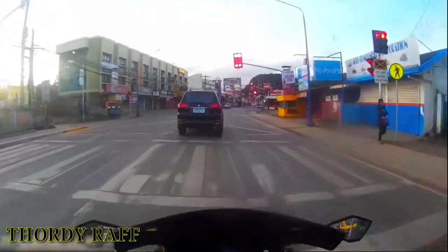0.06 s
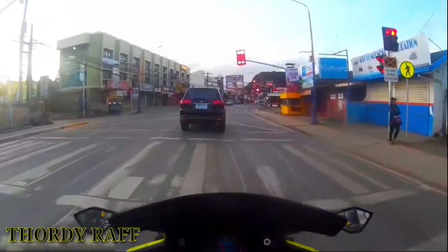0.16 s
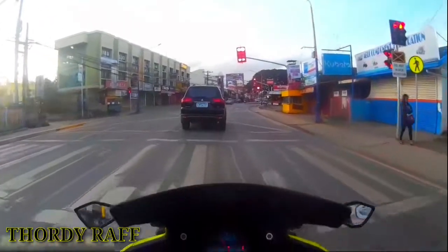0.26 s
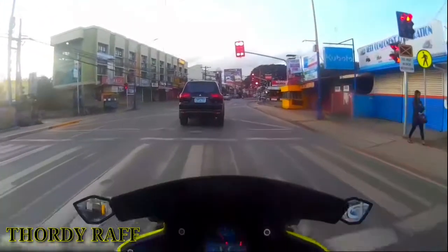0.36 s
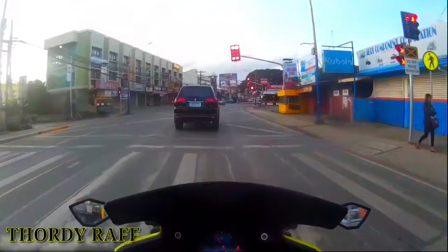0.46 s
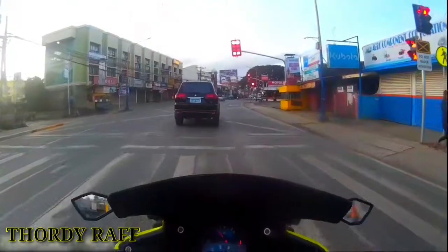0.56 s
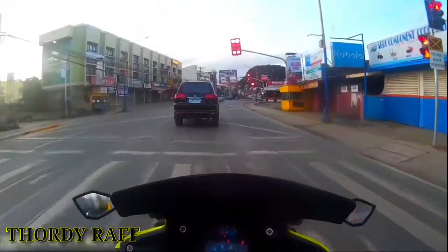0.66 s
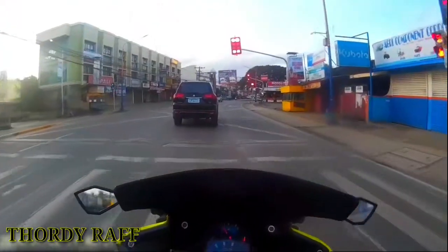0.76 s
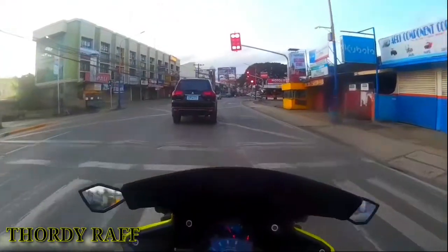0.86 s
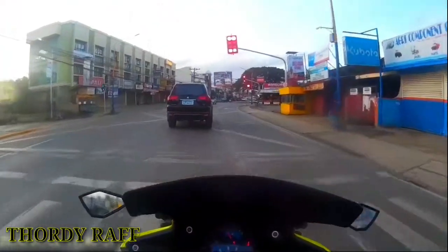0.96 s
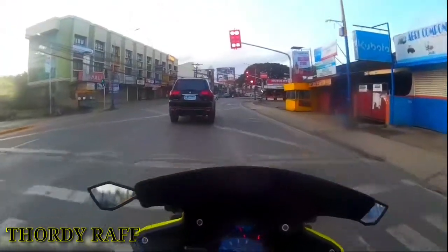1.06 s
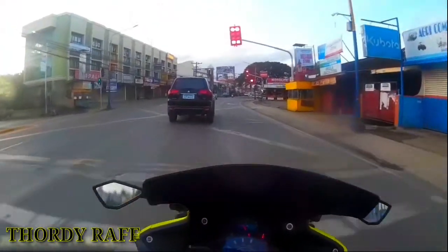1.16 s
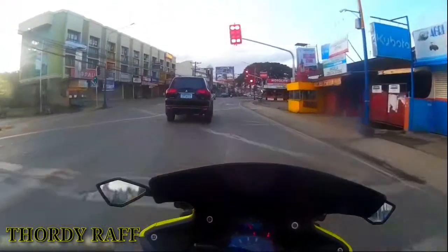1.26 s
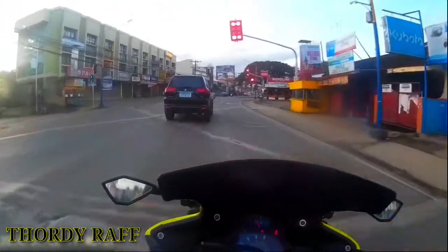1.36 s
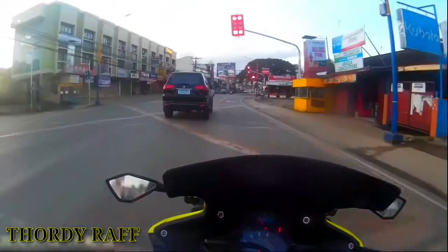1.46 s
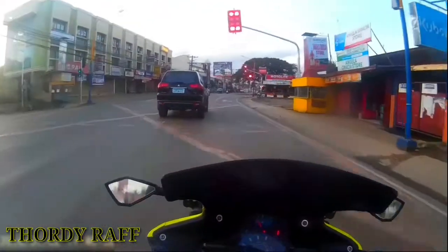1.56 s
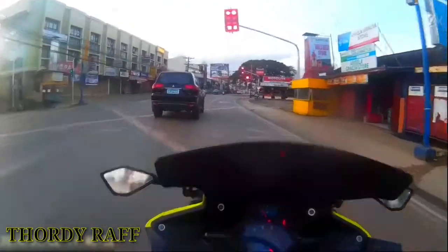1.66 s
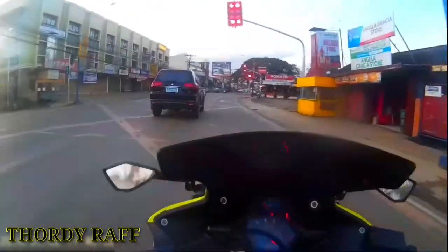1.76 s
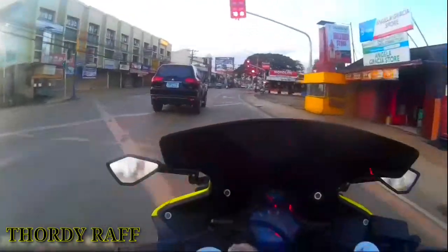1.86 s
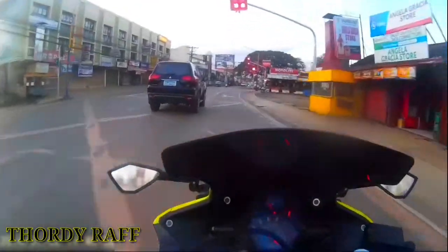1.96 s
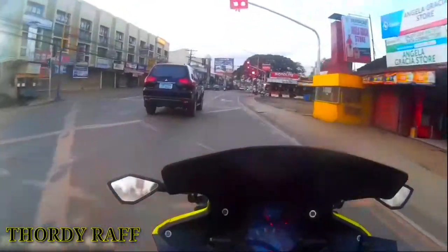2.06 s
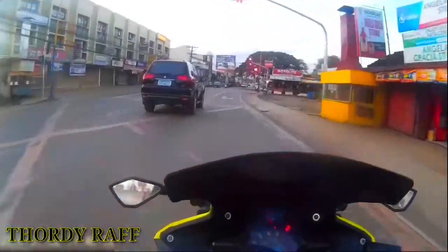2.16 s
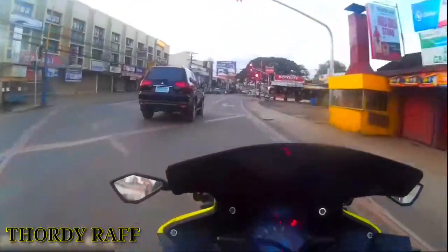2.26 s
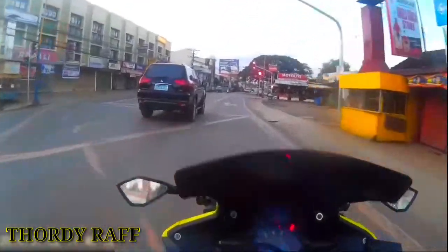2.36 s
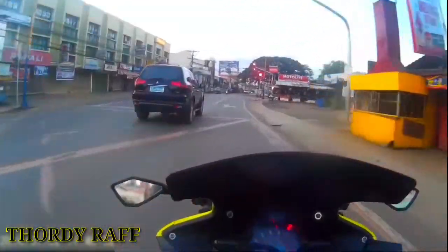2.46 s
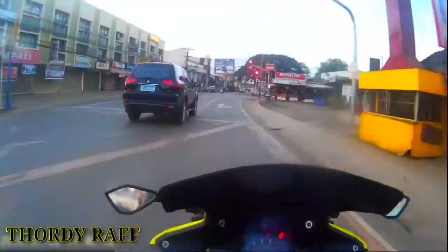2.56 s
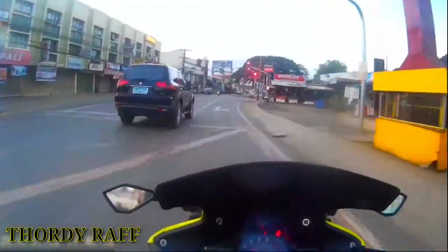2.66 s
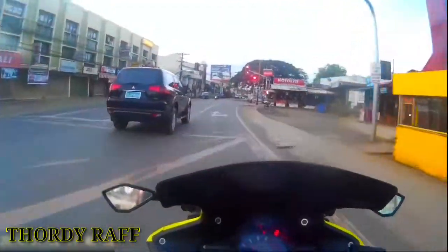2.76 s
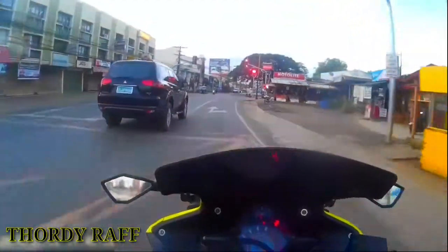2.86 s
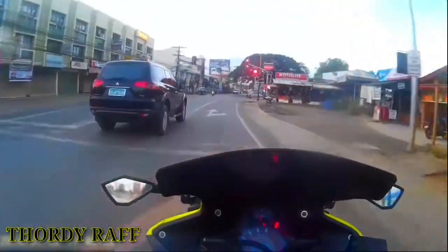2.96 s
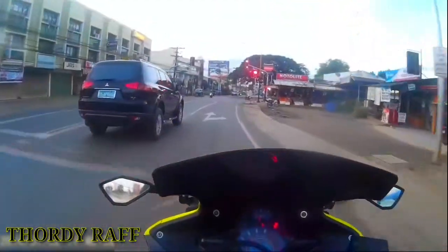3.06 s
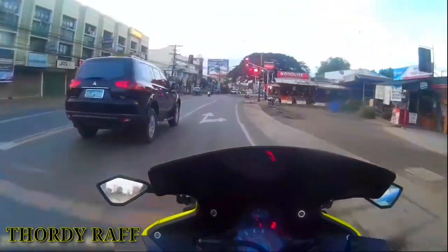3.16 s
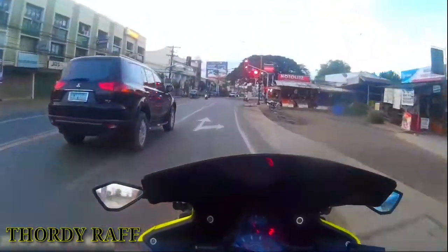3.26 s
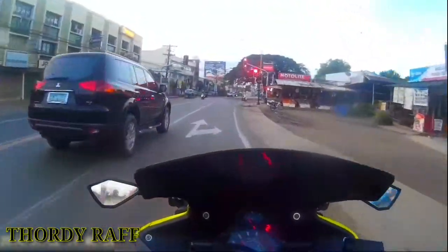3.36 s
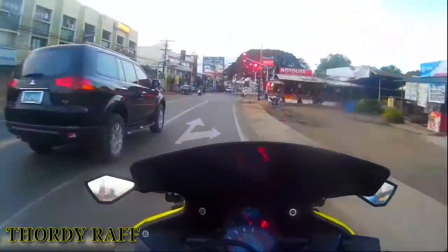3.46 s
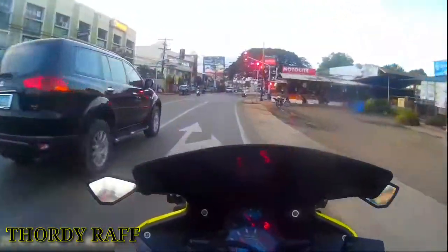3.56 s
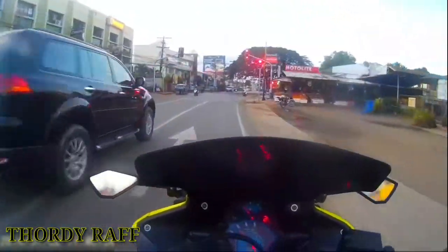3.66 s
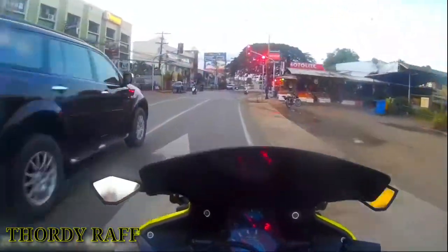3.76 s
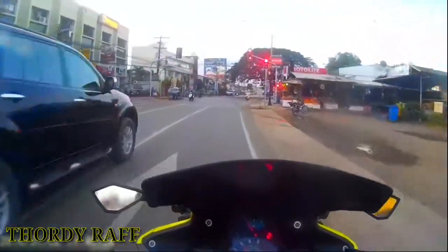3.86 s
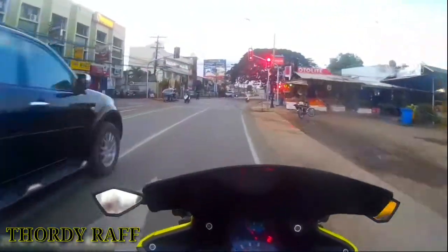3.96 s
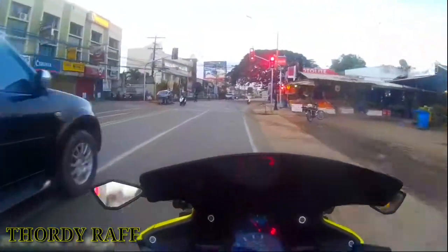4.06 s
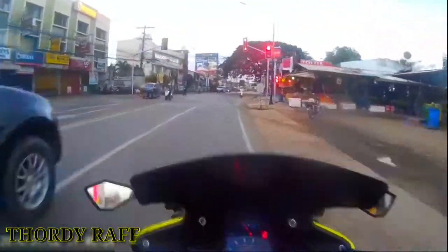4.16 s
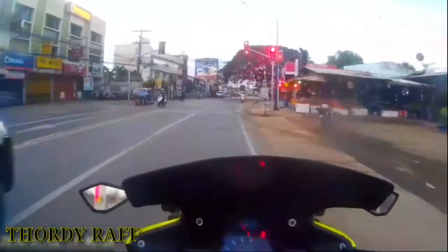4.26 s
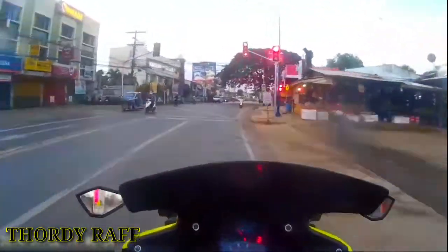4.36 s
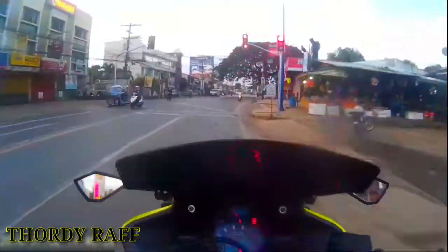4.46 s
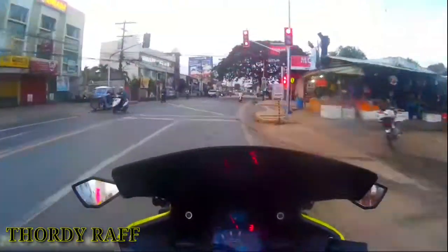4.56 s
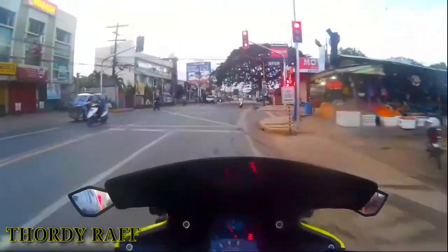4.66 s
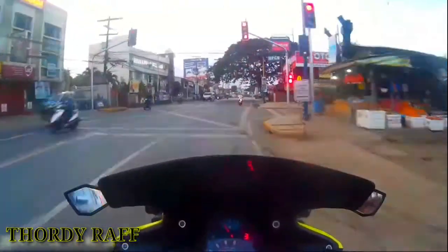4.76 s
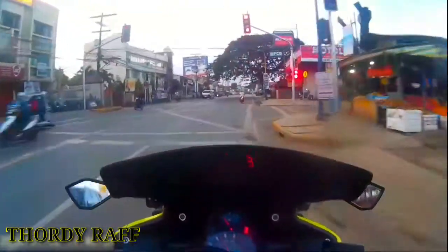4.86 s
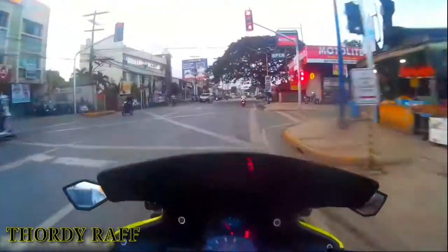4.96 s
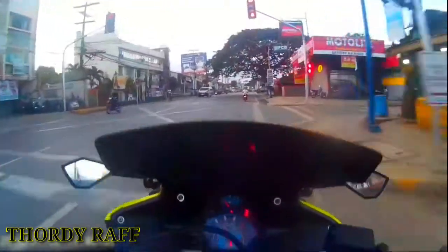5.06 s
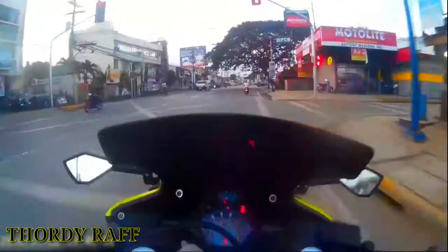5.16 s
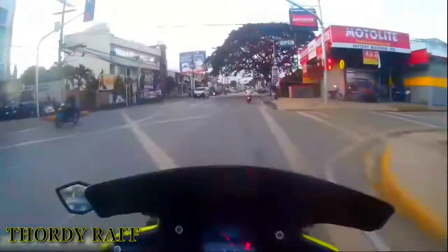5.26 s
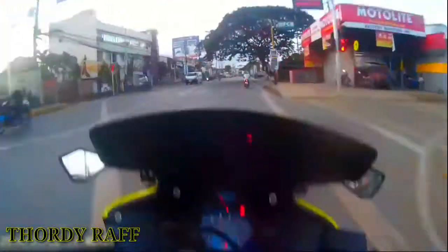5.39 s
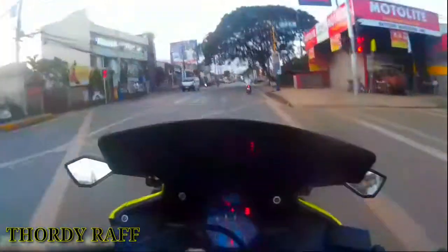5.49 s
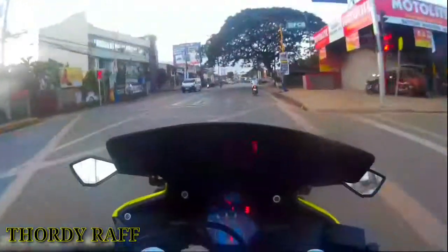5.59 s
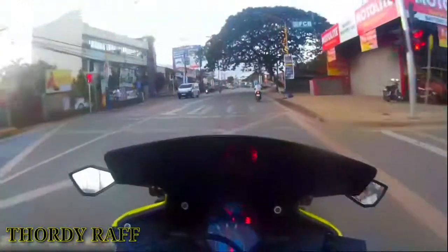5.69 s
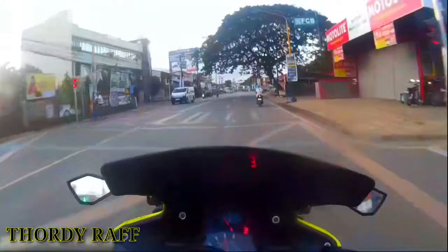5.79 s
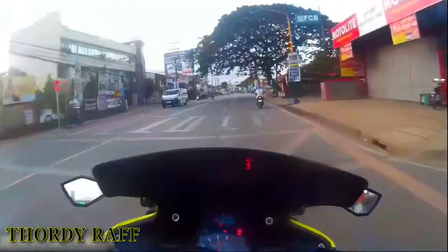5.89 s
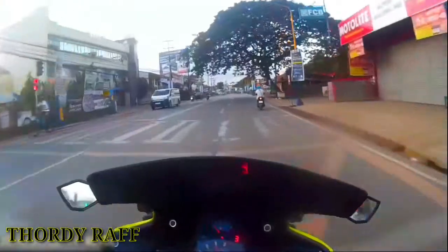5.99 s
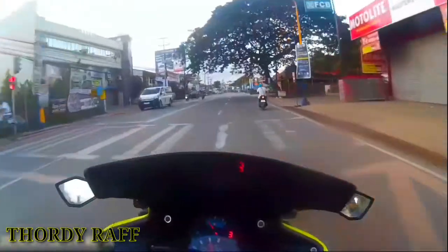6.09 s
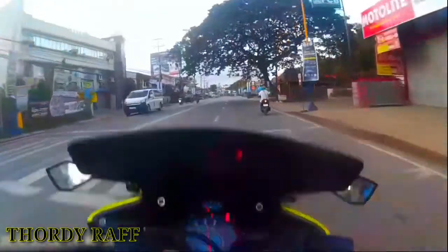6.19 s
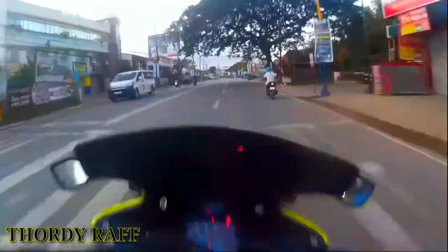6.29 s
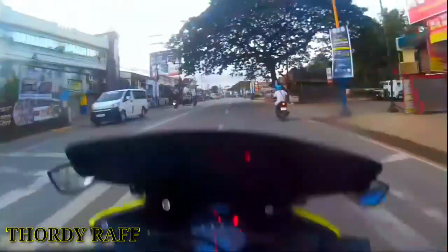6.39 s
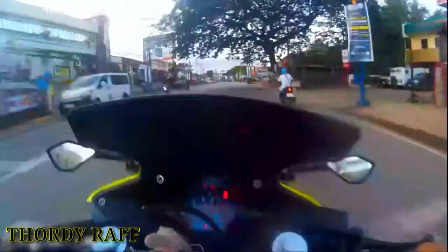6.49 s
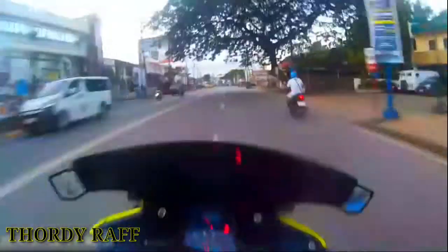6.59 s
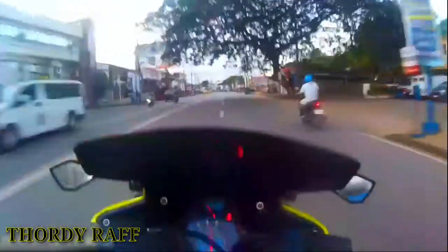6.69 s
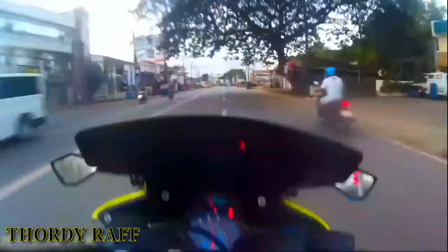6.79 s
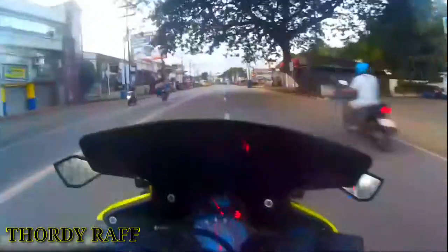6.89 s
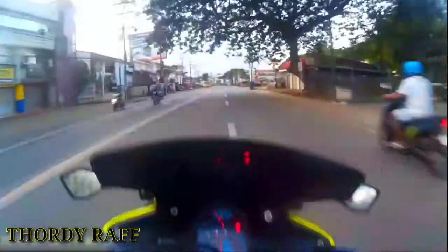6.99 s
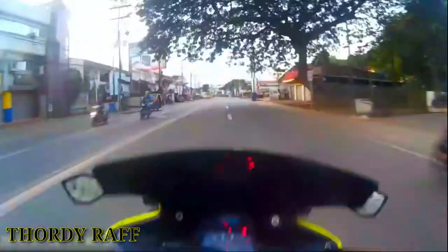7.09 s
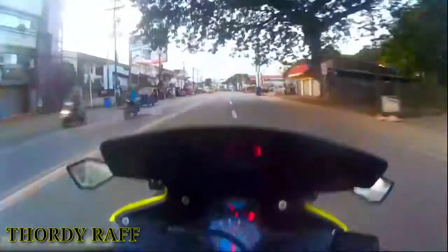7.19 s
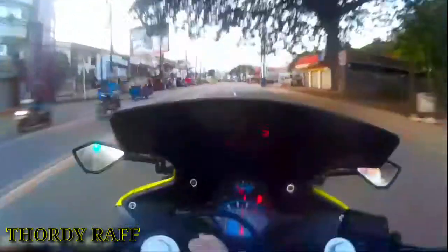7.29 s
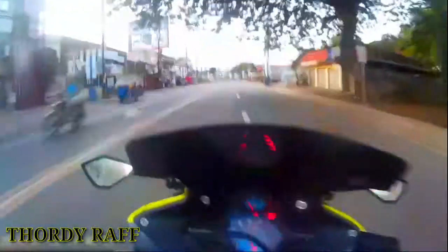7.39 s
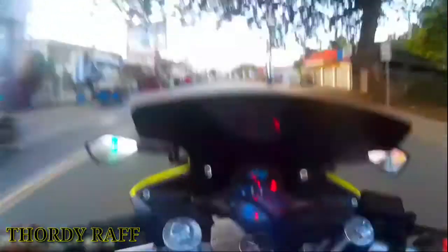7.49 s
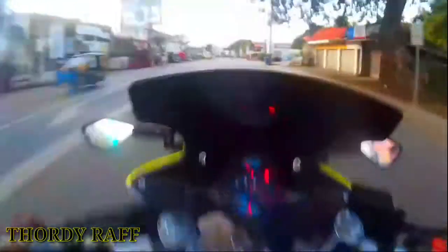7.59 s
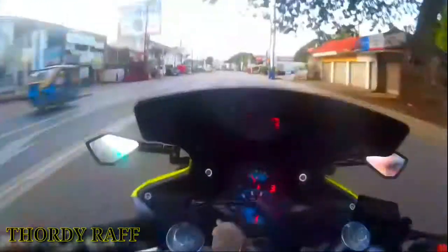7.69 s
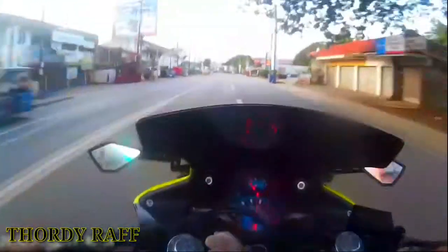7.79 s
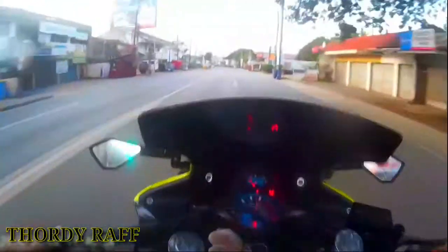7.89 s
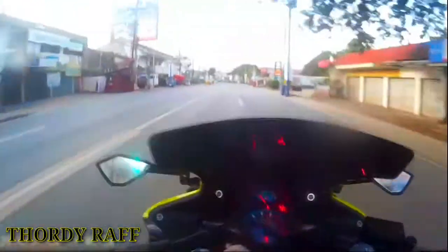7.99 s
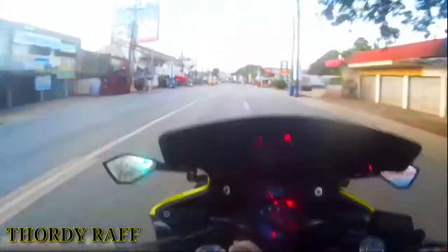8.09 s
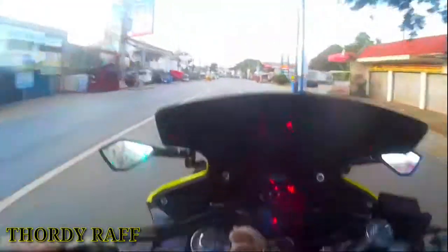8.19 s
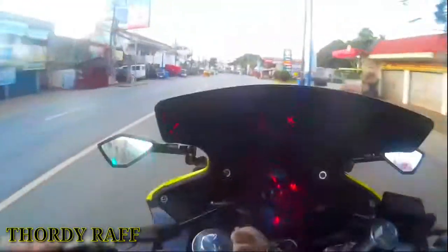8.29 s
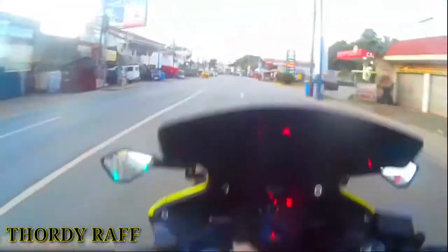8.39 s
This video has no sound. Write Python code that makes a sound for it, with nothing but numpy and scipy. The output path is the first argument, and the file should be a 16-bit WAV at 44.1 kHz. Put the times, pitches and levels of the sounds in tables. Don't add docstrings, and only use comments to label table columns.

```python
import sys
import numpy as np
from scipy import signal
from scipy.io import wavfile
from scipy.ndimage import uniform_filter1d

SR = 44100
rng = np.random.default_rng(int(sys.argv[2]) if len(sys.argv) > 2 else 0)


def voltage_ratio(decibels):
    exponent = np.asarray(decibels, float) / 20
    return 10 ** exponent


def persist_wave(psi):
    counts = np.round(np.clip(psi, -1, 1) * 32767).astype(np.int16)
    wavfile.write(sys.argv[1], SR, np.atleast_2d(counts).T)


N = 372204
T = np.arange(N) / SR
STEP = 64

# (t/s, level/dB)
AIRSPEED = [(0, -59), (1, -60), (1.9, -45), (2.1, -44.5), (2.7, -46), (3.5, -38.5), (4.4, -35),
            (5.2, -33.5), (6.5, -31), (7.5, -27), (8, -29), (8.44, -27)]


def evened(x):
    return x / np.sqrt(np.mean(x ** 2) + 1e-20)


def steady(x, span=4410):
    power = uniform_filter1d(uniform_filter1d(x ** 2, span), span)
    return x / np.sqrt(abs(power) + 1e-20)


def read(points, hz):
    f, value = np.transpose(points)
    return np.interp(np.log(hz + 1), np.log(f + 1), value)


def curve(points):
    return np.interp(T, *np.transpose(points))


def smooth(control):
    return np.interp(T, T[::STEP], control)


def colour(x, gain, size=8192):
    log_gain = np.log(np.maximum(gain(abs(np.fft.fftfreq(size, 1 / SR))), 1e-5))
    taps = np.fft.ifft(np.exp(np.conj(signal.hilbert(log_gain)))).real[:size // 2]
    return signal.oaconvolve(x, taps)[:N]


def drift(hz):
    coarse = signal.lfilter(*signal.butter(2, hz, fs=SR / STEP), rng.standard_normal(N // STEP + 1))
    return np.interp(T, np.arange(len(coarse)) * STEP / SR, evened(coarse))


def swell(s, length):
    return np.exp(-((T[::STEP] - s) / length) ** 2)


def street():
    # (f/Hz, level/dB per Hz)
    wash = [(12, -46), (20, -7), (54, -5), (157, -6), (282, -11), (517, -16.5), (1310, -21), (1420, -23),
            (2080, -21.5), (2500, -37), (3250, -63), (5500, -120)]
    noise = voltage_ratio(.7 * drift(4)) * rng.standard_normal(N)
    return voltage_ratio(-48) * evened(colour(noise, lambda f: voltage_ratio(read(wash, f))))


def hiss():
    # (f/Hz, level/dB per Hz)
    spectrum = [(1470, -53), (2500, 0), (3470, -2), (5070, -1.5), (6560, -1), (8560, -2.5), (11400, -1),
                (13400, -4), (15400, -20)]
    # (start t/s, end t/s, extra hiss before it/dB)
    ease = (1.3, 1.7, 1.5)
    noise = voltage_ratio(.5 * drift(12)) * rng.standard_normal(N)
    level_db = -56.47 + np.interp(T, ease[:2], [ease[2], 0])
    return voltage_ratio(level_db) * evened(colour(noise, lambda f: voltage_ratio(read(spectrum, f))))


def wind():
    # (f/Hz, level/dB per Hz)
    buffet = [(8, -22), (25, -11.5), (45, -5.5), (62, 1), (85, -3), (125, -6), (180, -14), (300, -20.5),
              (500, -24.5), (900, -71.5)]
    # (t/s, level/dB)
    gusts = [(2.92, 9), (3.08, 2), (3.16, -8), (3.42, 3), (3.67, -4), (3.74, 3), (3.83, 4), (3.9, 3.5),
             (4.72, -5), (4.98, -4), (5.15, 10.5), (5.44, 10), (5.5, -4), (5.64, 7), (5.75, -2), (6.51, 4),
             (6.63, 2), (7.03, 4), (7.31, 6), (7.57, 7), (7.73, 7), (7.89, 7), (7.93, 4), (8.01, 2),
             (8.12, -7), (8.3, 4.5)]
    gust_s, lumps_db = 0.015, -1
    noise = voltage_ratio(drift(22)) * rng.standard_normal(N)
    swings = colour(noise, lambda f: voltage_ratio(read(buffet, f)))
    gust_db = smooth(sum(db * swell(s, gust_s) for s, db in gusts))
    level_db = curve(AIRSPEED) + gust_db + lumps_db * drift(14.5) + 0.1
    return voltage_ratio(level_db) * steady(swings, span=8000)


def bumps():
    # (t/s, rattle level/dB, rattle length/s, thump level/dB)
    jolts = [
        (5.293, -31.5, 0.051, -27),
        (5.399, -29.5, 0.02, -22),
        (5.456, -28.5, 0.013, -15),
        (6.366, -25, 0.026, -29),
        (6.519, -33, 0.019, -21),
        (7.793, -27, 0.083, -27),
    ]
    thump_hz, thump_s = 62, 0.0078
    shape, thump = np.zeros(N), np.zeros(N)
    for s, rattle_db, length, thump_db in jolts:
        shape += voltage_ratio(rattle_db) * np.exp(-((T - s) / length) ** 2)
        pulse = np.exp(-((T - s) / thump_s) ** 2)
        thump += voltage_ratio(thump_db) * pulse * np.cos(2 * np.pi * thump_hz * (T - s))
    rattle = signal.lfilter(*signal.butter(1, 350, fs=SR), rng.standard_normal(N))
    rattle = evened(signal.lfilter(*signal.butter(2, 2200, fs=SR), rattle))
    return shape * rattle + thump


def controls():
    # (t/s, firing rate/Hz, mechanical effort/dB)
    rev_points = [(0, 30.5, -57), (.8, 40.7, -52.5), (1.5, 54.7, -37), (1.72, 59.2, -33.5),
                  (2.031, 63.1, -30), (2.21, 52.5, -38), (2.29, 44, -43.5), (4.1, 65.1, -26.5),
                  (4.25, 57.7, -31), (4.51, 44.9, -36), (5.1, 51.7, -36.5), (6.2, 54.4, -31),
                  (6.68, 59, -29.5), (7.45, 62.4, -24.5), (7.74, 62.8, -24), (7.92, 61.2, -28),
                  (8.08, 54.2, -32.5), (8.44, 53, -31)]
    # (t/s, exhaust level/dB, tilt/dB
    # per order, odd orders/dB)
    grip_points = [(0, -61, 9, 4), (.7, -49, -2.5, 3), (1.2, -40.5, -.5, 0), (1.5, -31.5, -6.5, 0),
                   (2, -30, -0.5, -7), (2.35, -36.5, 2, -6), (2.7, -33.5, -1.2, -0.5), (2.95, -35, -2.5, 4),
                   (3.35, -27, 0, -4.2), (3.8, -29.5, 2.5, 2), (4.1, -27, 6.5, 5), (4.35, -28.5, 0.5, 1),
                   (5.1, -30, 2, 2.8), (6.2, -26.5, 0.5, 1.5), (6.9, -28.5, 0.5, 1), (7.5, -26, 0.5, 3.5),
                   (7.95, -29, 0.5, 1.5), (8.44, -27, 1, .3)]
    # (t/s, change of firing
    # rate/Hz, length/s)
    snatches = [
        (1.616, -1.13, 0.051),
        (1.74, 0.98, 0.04988),
        (5.211, -1, .03),
        (5.289, 2.5, 0.049),
        (6.376, 4, 0.052),
        (6.527, -0.62, 0.0597),
        (6.962, -.55, 0.1502),
        (7.834, -0.9, 0.044),
        (8.217, .4, 0.093),
    ]
    # (t/s, length/s, exhaust change/dB, crank change/dB)
    shifts = [
        (2.024, 0.29, -25, -4),
        (4.104, 0.18, -22, -4),
        (7.77, .11, -17, -1.5),
    ]
    # (t/s, length/s, level/dB)
    buzz = (6.98, 0.99, 9.55)
    shut_s, shut_bend = 0.082, 0.73
    unload_db, unload_s = -9, 0.049
    coast_s = 0.092

    t = T[::STEP]
    (s, *revs), (at, *grip) = np.transpose(rev_points), np.transpose(grip_points)
    hz, effort_db = (np.interp(t, s, c) for c in revs)
    exhaust_db, tilt_db, odd_db = (np.interp(t, at, c) for c in grip)
    snatch = sum(change * swell(when, length) for when, change, length in snatches)
    hz = hz + snatch
    effort_db = effort_db + 0.94 * snatch

    shut_db, slack_db = np.zeros(len(t)), np.zeros(len(t))
    for when, length, exhaust_drop, crank_drop in shifts:
        shut_db += exhaust_drop * np.interp(t - when, [0, shut_s, length], [0, 1, 0]) ** shut_bend
        slack_db += unload_db * swell(when + unload_s, unload_s)
        slack_db += crank_drop * swell(when + length, coast_s)
    crank_db = -43 + 0.53 * (hz - 55) + 0.48 * shut_db + buzz[2] * swell(*buzz[:2])
    second_db = -37.5 + 0.42 * (hz - 55) + 0.76 * (effort_db + 33.5) + slack_db
    curves = hz, exhaust_db + shut_db, crank_db, second_db, effort_db, tilt_db, odd_db
    return (smooth(c) for c in curves)


def exhaust(hz, turns, clatter_db, tilt_db, odd_db):
    # (order/multiple of firing rate, level/dB)
    pulse = [(1, -17), (3, -5), (5, -3), (6, 5), (7, 4), (8, 2), (9, -2), (10, -4)]
    # (f/Hz, level/dB)
    silencer = [(60, -11), (150, -10), (180, -17), (220, -9.5), (255, -4), (290, -3), (320, -4), (350, -9),
                (385, -1), (415, -5.5), (435, -8), (458, -28.5), (520, -42)]
    spread = np.clip(.5 + .05 * (clatter_db + 33), .1, .5)
    boom = np.zeros(N)
    for k, db in pulse:
        lag = spread * (k - 6.3) ** 2 + 0.44 * drift(0.95)
        level_db = db + k % 2 * odd_db + tilt_db * np.clip(k - 6, -1, 2)
        level_db = level_db + read(silencer, k * hz) + 1.22 * drift(14)
        boom -= voltage_ratio(level_db) * np.cos(2 * np.pi * k * turns - lag)
    return steady(boom)


def crank(turns, crank_db, second_db):
    hum = voltage_ratio(crank_db + 0.76 * drift(17)) * np.sin(4 * np.pi * turns)
    hum += voltage_ratio(second_db + 1.65 * drift(21)) * np.cos(8 * np.pi * turns)
    return np.sqrt(2) * hum


def case_gain(hz):
    # (f/Hz, width/Hz, level/dB)
    resonances = [(790, 196, -7), (1010, 82, -4), (1120, 210, -3.5), (1305, 141, 1.5), (1628, 86, -1.5),
                  (2090, 222, -2.5), (2670, 170, -22), (2962, 96, -12.5), (3345, 330, -14),
                  (3770, 160, -20.5), (7550, 1200, -37)]
    # (f/Hz, level/dB)
    base = [(150, -19.5), (300, -3), (600, -11), (1150, -13.5), (1900, -16), (2500, -21), (4200, -31.5),
            (8000, -47), (12000, -64)]
    peaks = sum(voltage_ratio(db) ** 2 / (1 + (2 * (hz - f) / width) ** 2) ** 2 for f, width, db in resonances)
    return np.sqrt(peaks + voltage_ratio(read(base, hz)) ** 2)


def intake_roar(hz, turns, clatter_db, air_db):
    burst = .65 + .75 * np.exp(-((turns + .35) % 1) / .15) + .3 * np.exp(-((turns + .8) % 1) / .15)
    noise = burst * voltage_ratio(0.11 * drift(23)) * rng.standard_normal(N)
    roar = steady(colour(noise, case_gain))
    fizz = signal.lfilter(*signal.butter(3, 2500, "high", fs=SR), roar)
    bright_db = 0.13 * (clatter_db + 30) + 0.11 * (hz - 61) - 0.038 * (air_db + 37)
    return roar + (voltage_ratio(bright_db) - 1) * fizz


def snarl(hz, turns, count=38):
    # (f/Hz, level/dB)
    upper = [(400, -30), (470, -10), (550, -6), (620, -4), (690, -9), (770, 1), (850, -7), (920, -10),
             (1050, -3), (1320, -3), (1480, -15), (1880, -23), (2090, -9), (2400, -30)]
    edge = turns + .2 + .0012 * drift(25)
    shape = rng.standard_normal((count, 2))
    out = np.zeros(N)
    for k in range(8, count):
        size = smooth(voltage_ratio(read(upper, k * hz[::STEP]) + 1.3 * shape[k, 0]))
        lag = .07 * (k - 18) ** 2 - .7 * shape[k, 1] - .3 * drift(3)
        out += size * (1 + .2 * drift(8)) * np.cos(2 * np.pi * k * edge - lag)
    return steady(out)


def engine():
    hz, exhaust_db, crank_db, second_db, clatter_db, tilt_db, odd_db = controls()
    turns = np.cumsum(hz * (1 + .001 * drift(10))) / SR
    air_db = curve(AIRSPEED)
    boom = exhaust(hz, turns, clatter_db, tilt_db, odd_db)
    hum = crank(turns, crank_db, second_db)
    load_db = np.clip(.45 * (exhaust_db - clatter_db - 2), -8, 0)
    load_db = load_db + .25 * (clatter_db + 32) - .1 * (air_db + 48)
    clatter = intake_roar(hz, turns, clatter_db, air_db) + 1.15 * voltage_ratio(load_db) * snarl(hz, turns)
    return voltage_ratio(exhaust_db - 0.18) * boom + hum + voltage_ratio(clatter_db - 3.5) * clatter


def scene():
    return (street() + hiss() + wind() + bumps() + engine())[None]


def low_pass(x):
    return signal.sosfilt(signal.butter(12, 15510, fs=SR, output="sos"), x)


def record(dry):
    rounded = .55 * np.tanh(dry / .55)
    fade = np.minimum((N / SR - T) / .005, 1)
    return low_pass(rounded * fade)


dry = scene()
out = record(dry)
persist_wave(out)
```